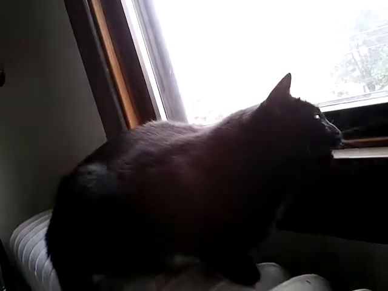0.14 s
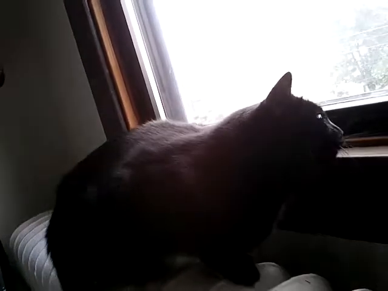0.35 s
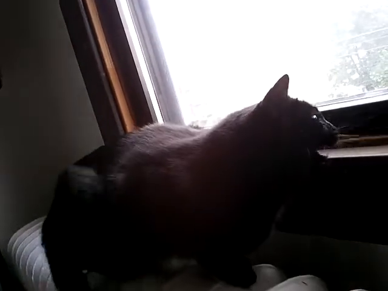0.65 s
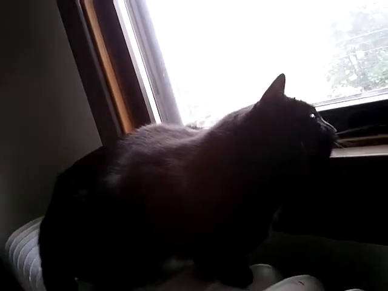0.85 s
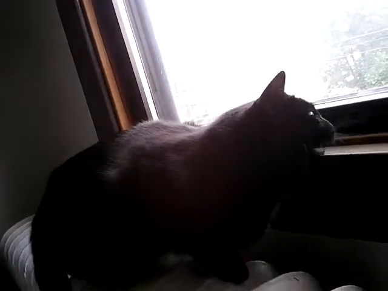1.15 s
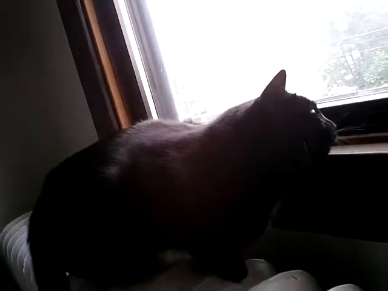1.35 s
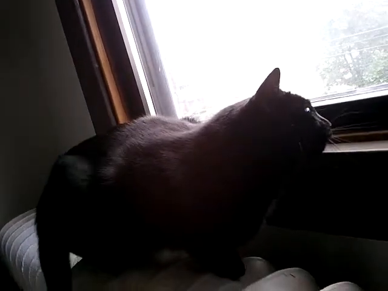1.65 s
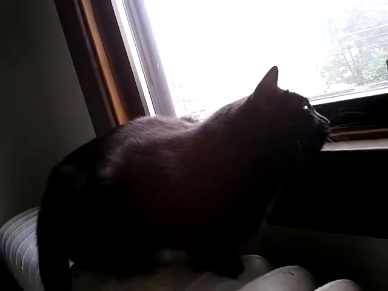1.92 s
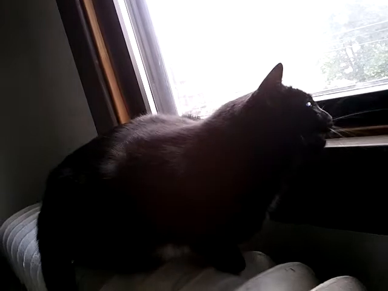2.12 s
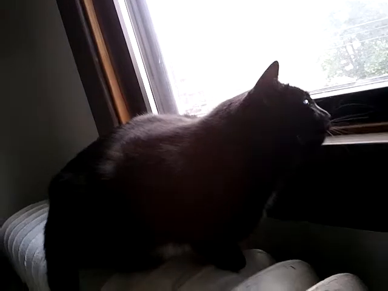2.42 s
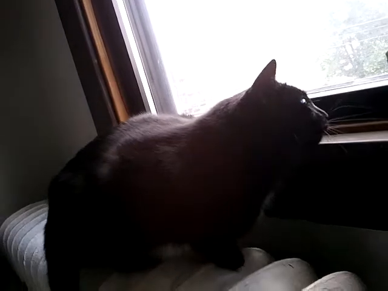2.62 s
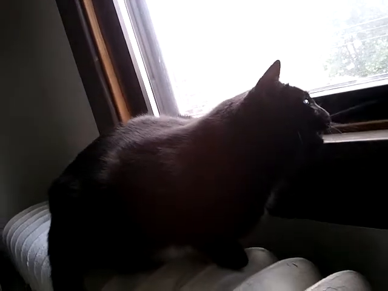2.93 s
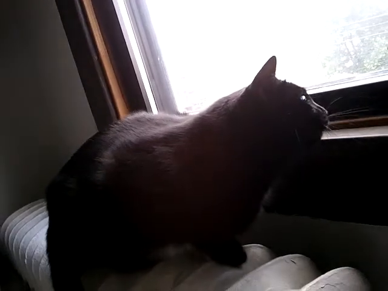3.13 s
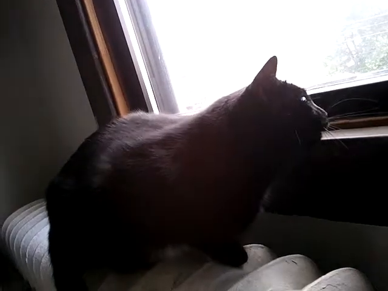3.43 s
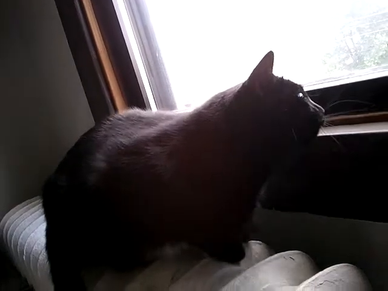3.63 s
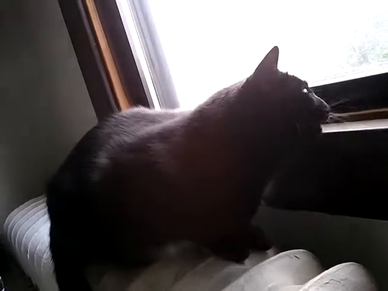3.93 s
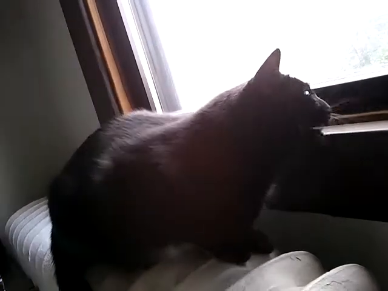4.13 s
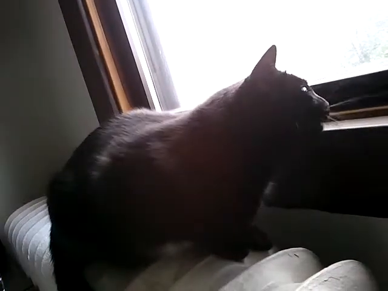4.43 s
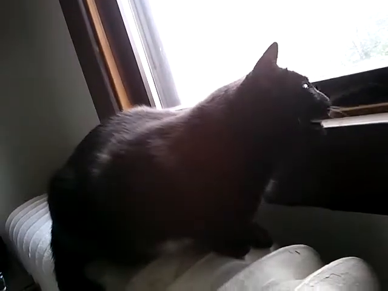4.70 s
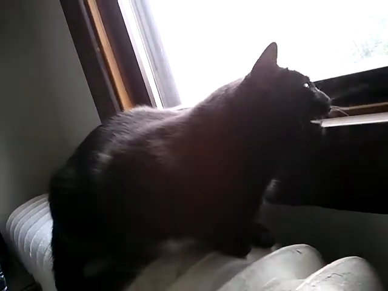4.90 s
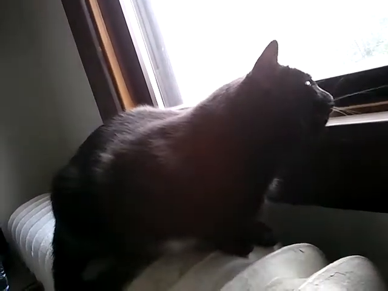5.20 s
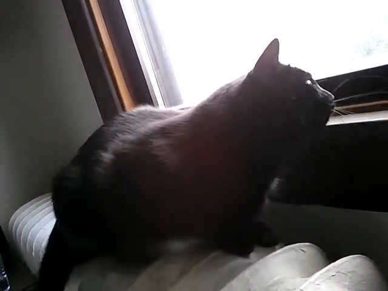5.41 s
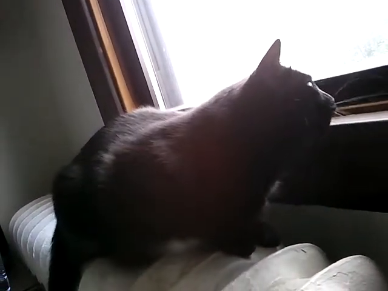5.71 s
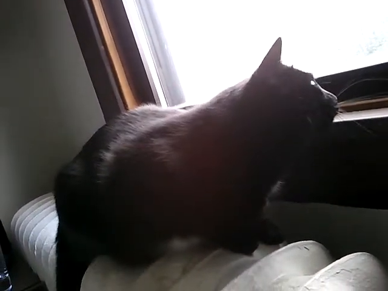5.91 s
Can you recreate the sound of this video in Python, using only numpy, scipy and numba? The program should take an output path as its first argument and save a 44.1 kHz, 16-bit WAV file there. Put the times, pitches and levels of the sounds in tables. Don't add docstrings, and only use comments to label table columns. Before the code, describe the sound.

A steady, deep mains-like hum, soft microphone hiss and dull traffic rumble last the whole six seconds. Close by, a cat chatters in tiny dry bursts. Faint breath puffs open, a click comes at 0.2, then clicks near 0.75 lead to a short high squeak at 0.85. A strong click with a hoarse squeak lands at 1.3, clicks and puffs at 1.6, and the clearest, most tonal squeak at 2.25. Clicks at 3.0 and 3.1 bring a squeak breaking into air. Paired clicks and puffs follow around 4.05, 4.25 and 4.45, then the sharpest click with a barked, airy squeak at 5.08; weak clicks end near 5.3 and 5.9. Thin birds chirp faintly at 0.4, 1.1, 2.1, 2.5, 2.8, 4.55 and 5.4. A far engine climbs from about 2.7, is strongest near 3.6, and eases by 4.3. The room echoes briefly.

```python
import sys
import numpy as np
from scipy import signal
from scipy.fft import rfft, irfft, next_fast_len
from scipy.io import wavfile
from scipy.ndimage import uniform_filter1d
from numba import njit

SR = 44100
rng = np.random.default_rng(int(sys.argv[2]) if len(sys.argv) > 2 else 0)


def bounce(signal):
    frames = np.transpose(np.atleast_2d(signal))
    limited = np.clip(frames, -1, 1)
    pcm = np.round(limited * 32767).astype(np.int16)
    wavfile.write(sys.argv[1], SR, pcm)


def amplitude_ratio(level_db):
    exponent = np.asarray(level_db, float) / 20
    return 10 ** exponent


N = 267069

# f/Hz, level/dB per Hz
RUMBLE_COLOUR = [(20, -78.5), (45, -80.5), (100, -84.5), (260, -90), (400, -92.5), (1200, -99),
                 (2000, -108), (4000, -125)]
# t/s, level/dB
RUMBLE_SWELL = [(0, 0.67), (1, -1.6), (2.7, -1.3), (3.6, 1.3), (4.6, -.8), (6.06, 1.6)]
# f/Hz, level/dB per Hz
HISS_COLOUR = [(500, -103), (2000, -104.5), (3400, -105), (4500, -105.5), (7000, -105), (7600, -107),
               (8000, -110), (8400, -116)]
# t/s, offset/full scale
AMPLIFIER_OFFSET = [(0, -.0991), (3, -.0995), (6.06, -.1004)]
# f/Hz, width/Hz, level/dB
HOUSE_MODES = [(177, 8, -76), (259.7, 5.9, -74.5), (344.4, 5.3, -76.5)]

# t/s, firing f/Hz, load/dB
ENGINE_REVS = [
    (1.6, 44.24, -10),
    (2.7, 54.46, -11.5),
    (3.3, 61.6, -1.5),
    (3.6, 70.65, 1),
    (3.9, 77.5, -2.5),
    (4.3, 82.47, -14),
    (4.9, 84.14, -12.5),
    (6.06, 85.74, -10.5),
]
# multiple of firing rate, level/dB, share of the load's swing
FIRING_ORDERS = [(1., -65.5, 0.32), (2., -65, 1.05), (3., -73, 0.68), (4., -77.5, 0.85), (5., -72.5, 1.4),
                 (9., -89.5, 0.37)]
# f/Hz, width/Hz, lift/dB
WALL_NOTES = [(58, 9.4, 10), (188, 15, 6.5), (267, 16, 9.5), (372, 13, 6), (682, 40, 19.5)]

# t/s after its start, length/s, start f/Hz, end f/Hz, level/dB
BIRD_MOTIF = [
    (0, 0.023, 5360, 5620, -73),
    (0.009, .025, 5200, 5060, -63),
    (0.042, .014, 5600, 5820, -61),
]
MOTIF_STARTS = [1.107, 2.063]
# t/s, length/s, start f/Hz, end f/Hz, level/dB
BIRD_WHISTLES = [
    (.39, 0.068, 5300, 5300, -82.5),
    (2.753, .039, 5270, 5300, -74.5),
    (5.41, .2, 6230, 6100, -78),
]
# t/s, length/s, start f/Hz, end f/Hz, level/dB
BIRD_RASPS = [
    (0.421, 0.055, 6000, 5640, -67.5),
    (2.516, 0.081, 5330, 5130, -68),
    (2.769, 0.084, 5680, 5770, -63.5),
    (4.551, 0.1, 4920, 6100, -68.5),
]

# f/Hz, width/Hz, level/dB
THROAT_MODES = [(370, 180, -2), (680, 350, -1), (1300, 600, -1)]
PALATE_MODES = [(3420, 400, 0), (3950, 350, -.5)]
TEETH_MODES = [(5300, 430, -3.5), (6100, 700, -1), (6790, 1160, -2.3)]

# t/s, length/s, effort level/dB, starting hiss level/dB
BREATH_PUFFS = [(.002, .026, -61.5, -65), (0.047, 0.048, -63.5, -68.5), (0.196, 0.037, -58, -62),
                (0.803, 0.012, -57.5, -63), (1.588, 0.022, -61.5, -73.5), (1.636, .022, -64, -70.5),
                (2.355, 0.032, -66.5, -71.5), (2.993, .024, -60.5, -68.5), (4.071, 0.042, -66.5, -74.5),
                (4.247, .02, -61, -58), (4.296, .037, -64.5, -63.5), (4.478, .033, -60.5, -62.5)]
# t/s, length/s, f/Hz, level/dB
CHEST_HUFFS = [
    (.195, 0.018, 470, -64),
    (1.325, .035, 360, -60),
    (1.565, 0.034, 260, -62),
    (3.112, 0.025, 450, -60.5),
    (5.092, .028, 530, -63),
]
# t/s, peak level/dB, upper band relative level/dB, mouth resonance f/Hz
MOUTH_CLICKS = [(0.186, -43.5, -1.5, 2030), (0.6032, -64, 5, 1780), (0.734, -55.5, -2.5, 1780),
                (0.7901, -39, -3.5, 1930), (1.2602, -64, -14, 1930), (1.3274, -35, -19, 2150),
                (1.573, -54, -20, 1800), (1.5874, -43, -12.5, 2110), (2.1939, -64, 15.5, 1870),
                (2.228, -39.5, 0, 1880), (2.4964, -57.5, -2.5, 1860), (2.707, -65.5, -2, 1900),
                (2.955, -59.5, 7, 1850), (2.985, -39.5, -7, 1880), (3.105, -38.5, -8, 2070),
                (3.2684, -72.5, -3, 1837), (4.026, -52, -2.5, 1800), (4.0558, -45.5, -0.5, 1900),
                (4.2106, -67.5, 10.5, 1910), (4.2338, -41, -3.5, 2200), (4.4378, -52, 0, 1850),
                (4.4651, -44, 1, 2010), (4.785, -47, -19, 1850), (5.0805, -33, -10.5, 2060),
                (5.2844, -53, -8.5, 1800), (5.9275, -55, -1.5, 2230)]

# t/s, effort level/dB, pitch f/Hz, voiced share/0-1, mouth resonance f/Hz
HIGH_SQUEAK = [(.832, -61, 860, .9, 2500), (.838, -57, 830, .9, 2480), (.847, -59, 790, .8, 2350),
               (.855, -59, 840, .85, 2450), (.861, -65, 840, .15, 2400), (.874, -64, 830, .1, 2400),
               (.881, -72, 830, .1, 2400)]
HOARSE_SQUEAK = [(1.308, -54, 507, .45, 2100), (1.316, -49, 510, .65, 2250), (1.331, -48.5, 471, .55, 2150),
                 (1.341, -56, 455, .3, 2180), (1.354, -51, 455, .3, 2400), (1.363, -54, 450, .2, 2500)]
CLEAR_SQUEAK = [(2.232, -60, 630, .5, 1950), (2.239, -50, 648, .88, 1945), (2.265, -44.5, 660, .92, 1980),
                (2.283, -49, 652, .9, 1955), (2.288, -54, 638, .85, 2540), (2.299, -52, 660, .55, 2030),
                (2.316, -56, 658, .55, 2000), (2.327, -59, 658, .35, 2000)]
BROKEN_SQUEAK = [(3.093, -56, 548, .8, 2180), (3.105, -48.5, 552, .85, 2200), (3.113, -56, 550, .35, 2200),
                 (3.128, -55, 520, .4, 2300), (3.14, -52, 500, .5, 2950), (3.146, -55, 500, .2, 2950)]
BARKED_SQUEAK = [(5.062, -53, 545, .65, 1900), (5.074, -53, 550, .6, 2050), (5.085, -49.5, 552, .7, 2200),
                 (5.093, -57, 530, .2, 2300), (5.105, -51, 520, .3, 2300), (5.118, -49, 520, .35, 2450)]
# resonance width/Hz, palate level/dB, lip tilt/dB,
# starting hiss level/dB, throat level at full effort/dB
SQUEAK_SHAPES = [
    (804, 3.5, 2.5, -62, -59),
    (378, -4, -2, -56.5, -56.5),
    (101.3, -10, -1, -66, -56),
    (260., -4, -1, -58, -56),
    (450., -1.5, 0.2, -55, -57),
]

HUM_HZ, HUM_DB, HUM_WOBBLE_DB = 58.4, -46.3, 0.07
ENGINE_PHASE = 5.6
WAVERS_PER_NOTE, RASP_WIDE_HZ = 4.5, 800
HISS_RISE_DB_PER_S, HISS_OVER_DB = 151.5, 2.5
THROAT_FOLLOWS = 0.32
OPEN_MOUTH_HZ = 2100
PUFF_PEAK_AT, PUFF_START_DB, PUFF_END_DB = 0.35, -3, -7
PUFF_MOUTH_HZ, PUFF_WIDTH_HZ, PUFF_THROAT_DB = 2300, 900.0, -7.5
PANE_HZ, PANE_WIDTH_HZ, PANE_DB = 2960, 12.0, 3
ROOM_T60_S, ROOM_DB = 0.42, -12.5
MICROPHONE_CUTOFF_HZ = 8993


def in_time(rows):
    s, *columns = np.transpose(rows)
    return [np.interp(np.arange(N) / SR, s, c) for c in columns]


def rms_one(x):
    return x / np.sqrt(np.mean(x ** 2) + 1e-20)


def drift(rate, size):
    r = np.exp(-2 * np.pi * rate / SR)
    wander = signal.lfilter([1], [1, -2 * r, r * r], rng.standard_normal(size + 20000))
    return rms_one(wander[20000:])


def noise(spectrum):
    size = next_fast_len(N)
    hz = np.maximum(np.fft.rfftfreq(size, 1 / SR), 1)
    points_hz, points_db = np.transpose(spectrum)
    colour = amplitude_ratio(np.interp(np.log(hz), np.log(points_hz), points_db)) * np.minimum(hz / 12, 1) ** 2
    return irfft(rfft(rng.standard_normal(size)) * colour * np.sqrt(SR / 2), size)[:N]


@njit
def resonance(x, hz, width, rate):
    y = np.zeros(len(x))
    r = np.exp(-np.pi * width / rate)
    for i in range(2, len(x)):
        drive = (1 - r * r) / 2 * (x[i] - x[i - 2])
        y[i] = drive + 2 * r * np.cos(2 * np.pi * hz[i] / rate) * y[i - 1] - r * r * y[i - 2]
    return y


def cavity(x, modes):
    return sum((-1) ** k * amplitude_ratio(db) * resonance(x, np.full(len(x), 1. * hz), 1. * width, 1. * SR)
               for k, (hz, width, db) in enumerate(modes))


def floor():
    rumble = noise(RUMBLE_COLOUR) * amplitude_ratio(in_time(RUMBLE_SWELL)[0] + 1.2 * drift(6.3, N))
    hiss = noise(HISS_COLOUR) * amplitude_ratio(0.5 * drift(3, N) + 0.7 * drift(30, N))
    return rumble + hiss


def house():
    rumble = rng.standard_normal(N)
    return sum(amplitude_ratio(db) * rms_one(cavity(rumble, [(hz, width, 0)])) for hz, width, db in HOUSE_MODES)


def hum():
    level = np.sqrt(2) * amplitude_ratio(HUM_DB + HUM_WOBBLE_DB * drift(1.9, N))
    return level * np.sin(2 * np.pi * HUM_HZ * np.arange(N) / SR + 0.36)


def engine():
    firing_hz, load_db = in_time(ENGINE_REVS)
    uneven_hz = firing_hz * (1 + 0.003 * drift(9.1, N))
    turns = np.cumsum(uneven_hz) / SR + ENGINE_PHASE / (2 * np.pi)
    out = np.zeros(N)
    for k, db, share in FIRING_ORDERS:
        wall_db = sum(lift_db * np.exp(-((k * firing_hz - hz) / width) ** 2)
                      for hz, width, lift_db in WALL_NOTES)
        level_db = db + share * load_db + wall_db + 2.0 * drift(1.3, N)
        out += np.sqrt(2) * amplitude_ratio(level_db) * np.sin(2 * np.pi * k * turns)
    return out


def birds():
    out = np.zeros(N)
    motifs = [(start + s, *note) for start in MOTIF_STARTS for s, *note in BIRD_MOTIF]
    notes = [(*note, WAVERS_PER_NOTE / note[1]) for note in [*BIRD_WHISTLES, *motifs]]
    notes += [(*note, RASP_WIDE_HZ) for note in BIRD_RASPS]
    for s, length, start_hz, end_hz, db, wander_hz in notes:
        along = np.linspace(0, 1, round(length * SR))
        phase = 2 * np.pi * np.cumsum(start_hz + (end_hz - start_hz) * along) / SR
        note = (0.5 + drift(wander_hz, len(along))) * np.sin(phase)
        note += drift(wander_hz, len(along)) * np.cos(phase)
        swell = np.sqrt(abs(np.sin(np.pi * along)))
        out[round(s * SR):][:len(along)] += amplitude_ratio(db) * swell * note
    return out


def mouth(x, mouth_hz, width, palate_db, lips_db=-2, stretch=1):
    palate, throat = [[(stretch * hz, wide, db) for hz, wide, db in modes]
                      for modes in (PALATE_MODES, THROAT_MODES)]
    middle = resonance(x, mouth_hz, width, 1. * SR) - amplitude_ratio(palate_db) * cavity(x, palate)
    middle_band = signal.butter(2, [1300, 4200 * stretch], "band", fs=SR, output="sos")
    teeth = [(hz, wide, db + lips_db * (k - 1)) for k, (hz, wide, db) in enumerate(TEETH_MODES)]
    upper_band = signal.butter(2, [4600, 7900], "band", fs=SR, output="sos")
    upper = signal.sosfilt(upper_band, cavity(x, teeth))
    return signal.sosfilt(middle_band, middle), upper, cavity(x, throat)


def call(rows, width, palate_db, lips_db, hiss_db, throat_db):
    s, *columns = np.transpose(rows)
    start = round(s[0] * SR)
    t = np.arange(start, round((s[-1] + 0.003) * SR)) / SR
    level_db, pitch_hz, voiced, mouth_hz = [np.interp(t, s, c) for c in columns]
    voiced = np.clip(voiced, 0, 1)
    stretch = max(1, mouth_hz[0] / OPEN_MOUTH_HZ) if voiced[0] > 0.5 else 1
    upper_db = np.minimum(hiss_db + HISS_RISE_DB_PER_S * (t - t[0]), level_db + HISS_OVER_DB)
    lower_db = throat_db + THROAT_FOLLOWS * (level_db - level_db.max())

    jitter = 1 + (0.006 + 0.25 * (1 - voiced) ** 2) * drift(200, len(t))
    cycle = np.cumsum(pitch_hz * jitter) / SR
    pulses = rms_one(sum(np.cos(2 * np.pi * k * cycle) * 0.74 ** k for k in range(1, 12)))
    gate = (0.5 + 0.5 * np.cos(np.pi * cycle)) ** 2 + 0.9
    breath = rms_one(rng.standard_normal(len(t)) * gate * amplitude_ratio(1.5 * drift(100, len(t))))

    voice = voiced * pulses + (1 - voiced) * breath
    middle, _, throat = mouth(voice, mouth_hz, 1. * width, palate_db, stretch=stretch)
    airy = voiced * pulses + 2.2 * (1 - voiced) * breath + 0.3 * breath
    upper = mouth(airy, mouth_hz, 1. * width, palate_db, lips_db)[1]
    even = [b / np.sqrt(uniform_filter1d(b ** 2, size=500) + 1e-6) for b in (middle, upper, throat)]
    sound = amplitude_ratio(level_db) * even[0] + amplitude_ratio(upper_db) * even[1] + amplitude_ratio(lower_db) * even[2]
    edges = np.clip(np.minimum(t - t[0], t[-1] - t) / 0.003, 0, 1)
    out = np.zeros(N)
    out[start:][:len(t)] = edges * sound
    return out


def puff(s, length, db, hiss_db):
    shape = [(0, PUFF_START_DB), (PUFF_PEAK_AT, 0), (1, PUFF_END_DB)]
    rows = [(s + along * length, db + down_db, 500, 0.05, PUFF_MOUTH_HZ) for along, down_db in shape]
    return call(rows, PUFF_WIDTH_HZ, -2.5, 0.98, hiss_db, db + PUFF_THROAT_DB)


def huffs():
    out = np.zeros(N)
    for s, length, hz, db in CHEST_HUFFS:
        size = round(length * SR)
        push = cavity(rng.standard_normal(size), [(hz, 180, 0)])
        push = cavity(push, [(hz, 260, 0)])
        out[round(s * SR):][:size] += amplitude_ratio(db + 4.0) * np.hanning(size) * rms_one(push)
    return out


def clicks():
    out, size = np.zeros(N), 1000
    for s, db, upper_db, hz in MOUTH_CLICKS:
        lag, flutter = rng.random(2)
        kick = 0.1 * rng.standard_normal(size) * np.exp(-np.arange(size) / SR / 0.0025)
        kick[3] += 1
        kick[round((0.003 + 0.0015 * lag) * SR)] -= 0.2 + 0.2 * flutter
        bands = mouth(kick, np.full(size, 1. * hz), width=280.0, palate_db=-5.5)
        middle, upper, low = [b / abs(b).max() for b in bands]
        click = middle + amplitude_ratio(upper_db) * upper + amplitude_ratio(-11.0) * low
        out[round((s - 0.0005) * SR):][:size] += amplitude_ratio(db) * click
    return out


def cat():
    calls = [HIGH_SQUEAK, HOARSE_SQUEAK, CLEAR_SQUEAK, BROKEN_SQUEAK, BARKED_SQUEAK]
    squeaks = sum(call(rows, *shape) for rows, shape in zip(calls, SQUEAK_SHAPES))
    puffs = sum(puff(*row) for row in BREATH_PUFFS)
    return clicks() + huffs() + squeaks + puffs


def pane(x):
    return cavity(x, [(PANE_HZ, PANE_WIDTH_HZ, PANE_DB)])


def room(x):
    t = np.arange(round(0.45 * SR)) / SR
    bright = rng.standard_normal(len(t)) * amplitude_ratio(-60 * t / (0.65 * ROOM_T60_S))
    low_pass = signal.butter(2, 3500, fs=SR, output="sos")
    dull = signal.sosfilt(low_pass, rng.standard_normal(len(t))) * amplitude_ratio(-60 * t / ROOM_T60_S)
    tail = (bright + 1.5 * dull) * np.clip((t - 0.002) / 0.004, 0, 1)
    return signal.fftconvolve(x, tail / np.sqrt(np.sum(tail ** 2)))[:N]


def scene():
    background = floor() + house() + hum() + engine()
    outside, near = birds(), cat()
    echoes = amplitude_ratio(ROOM_DB) * room(near) + amplitude_ratio(-6.0) * room(outside)
    return (background + outside + near + pane(near) + echoes)[None]


def roll_off(x):
    return signal.sosfilt(signal.butter(12, 8470, fs=SR, output="sos"), x)


def record(dry):
    low_pass = signal.cheby2(10, 50, MICROPHONE_CUTOFF_HZ * 1.1125, fs=SR, output="sos")
    mix = signal.sosfilt(low_pass, dry) + in_time(AMPLIFIER_OFFSET)[0]
    return roll_off(mix)


dry = scene()
out = record(dry)
bounce(out)
```